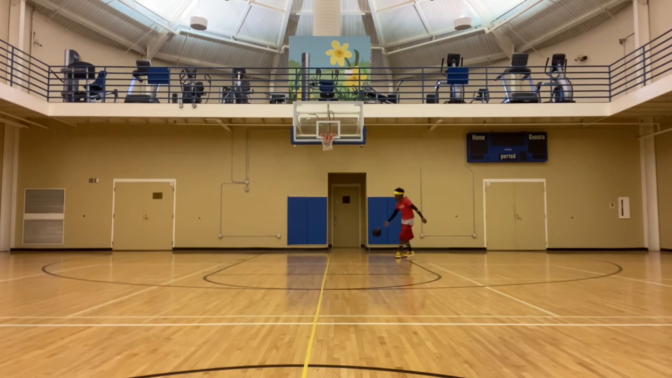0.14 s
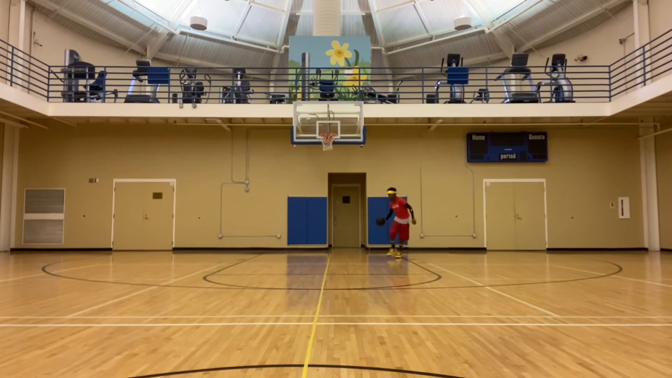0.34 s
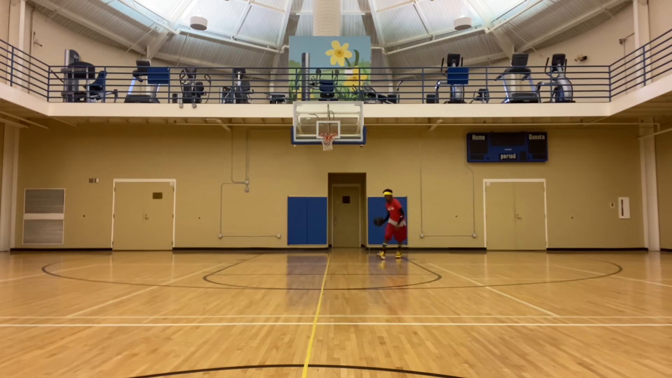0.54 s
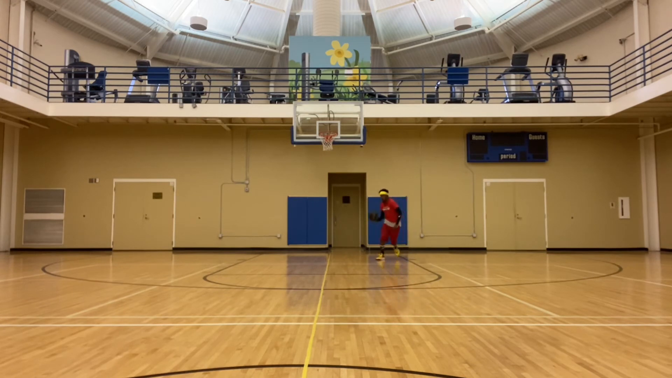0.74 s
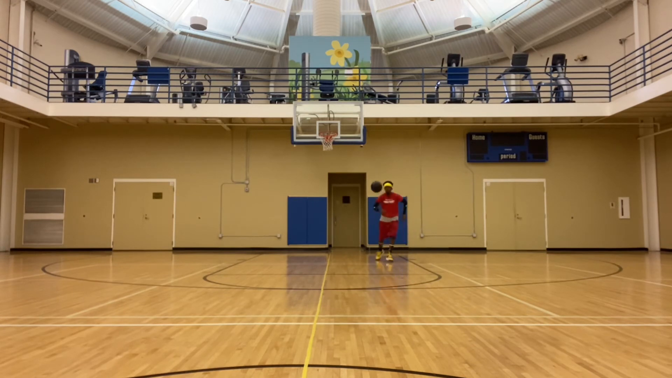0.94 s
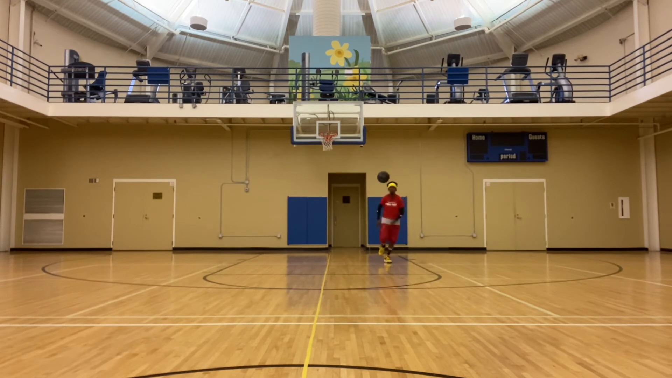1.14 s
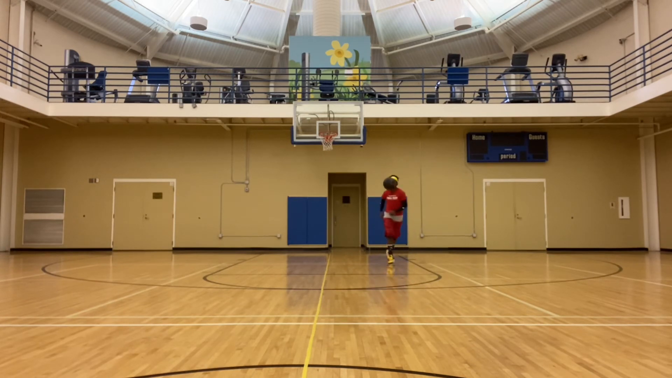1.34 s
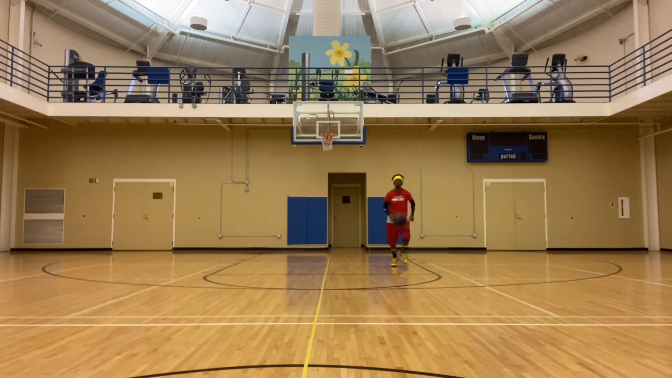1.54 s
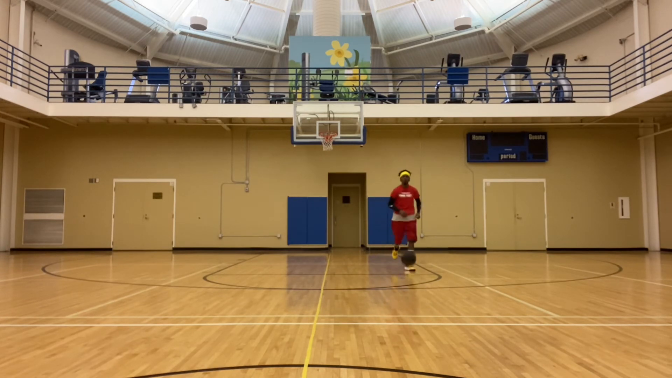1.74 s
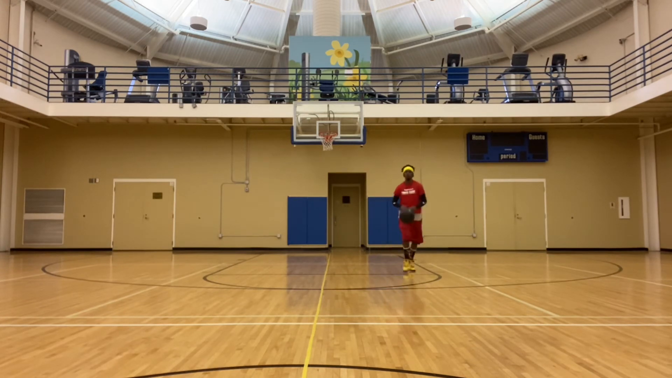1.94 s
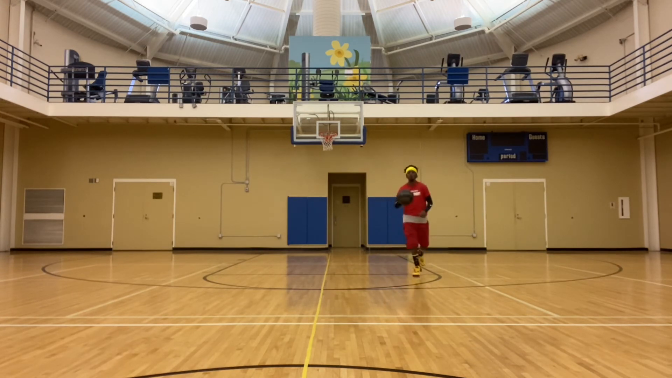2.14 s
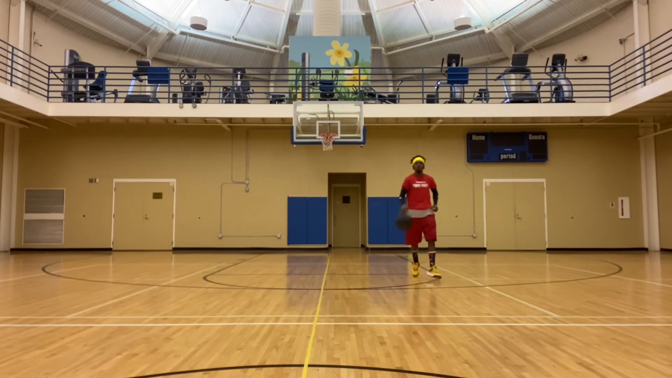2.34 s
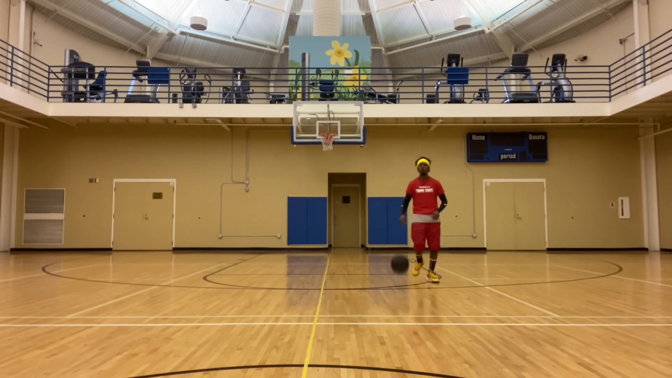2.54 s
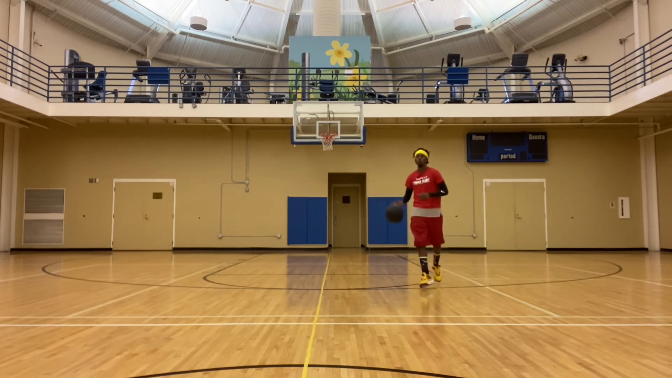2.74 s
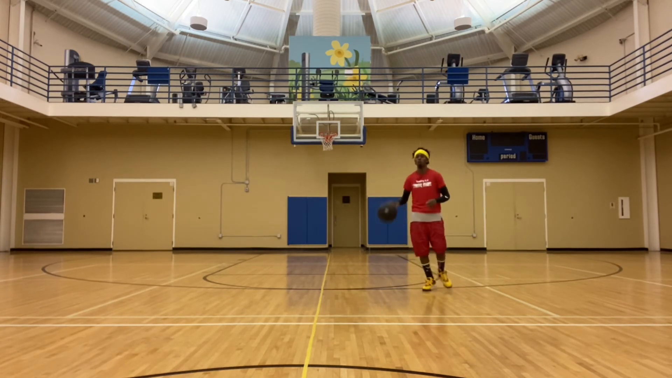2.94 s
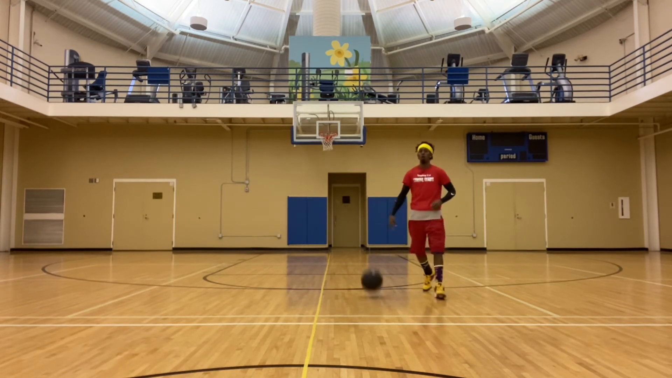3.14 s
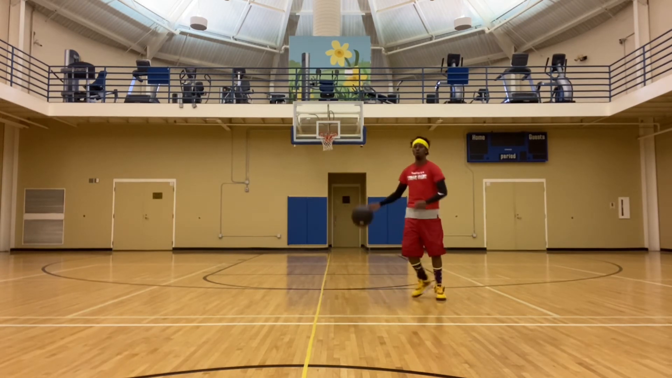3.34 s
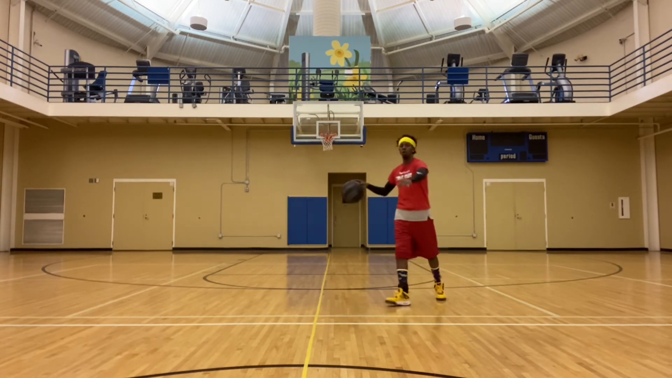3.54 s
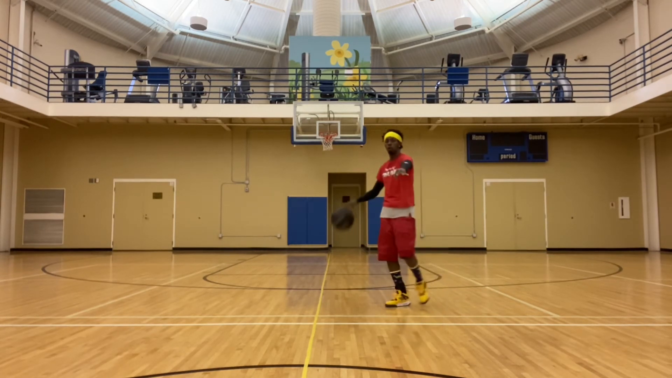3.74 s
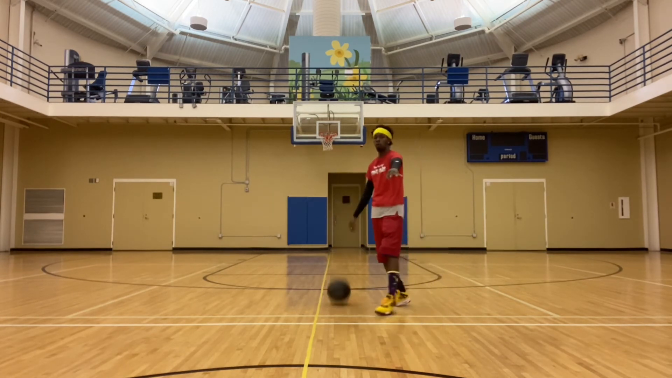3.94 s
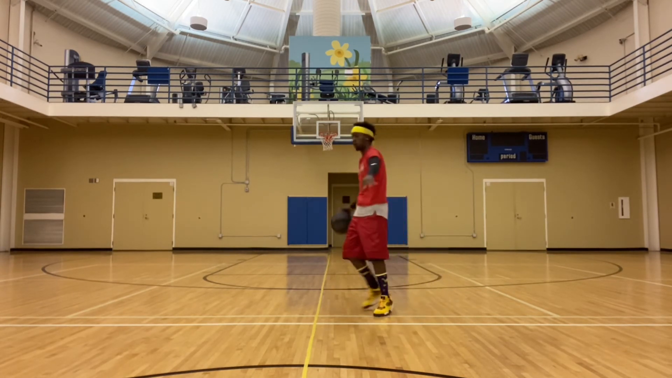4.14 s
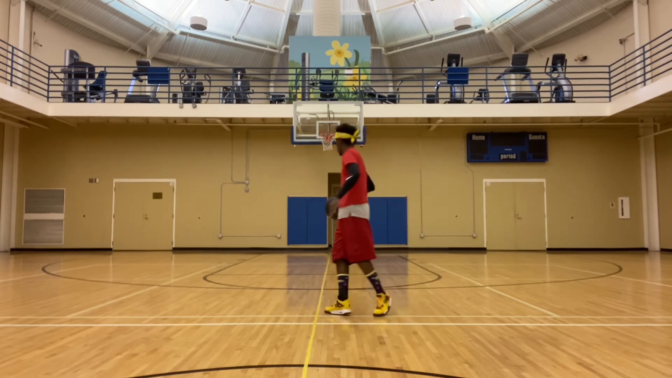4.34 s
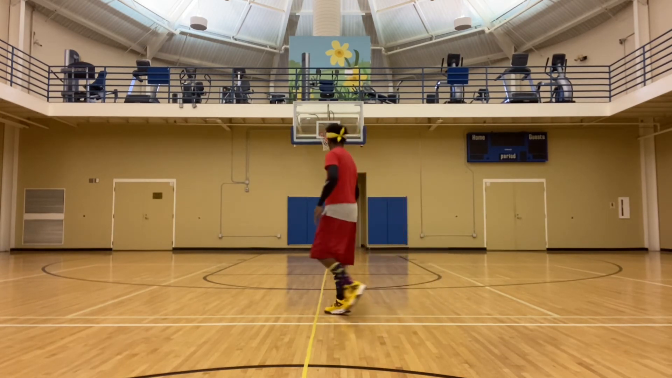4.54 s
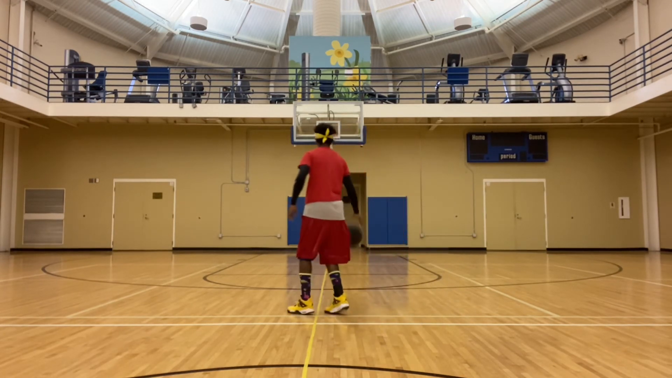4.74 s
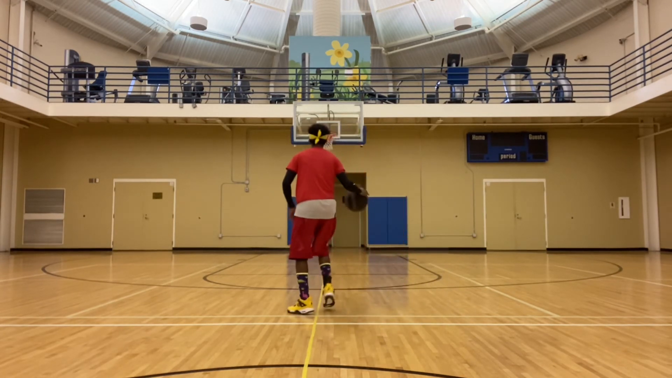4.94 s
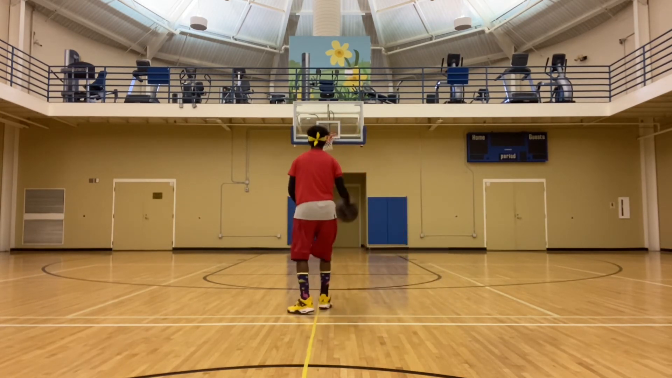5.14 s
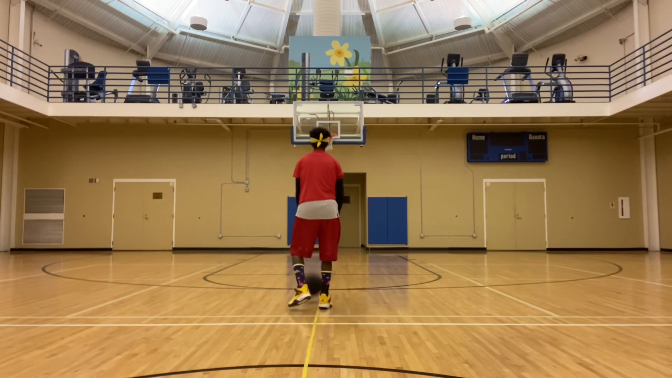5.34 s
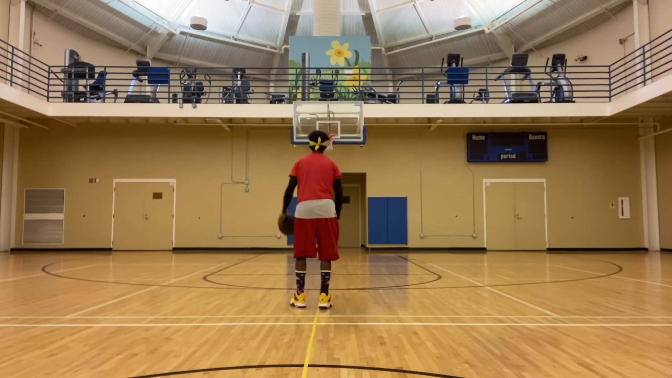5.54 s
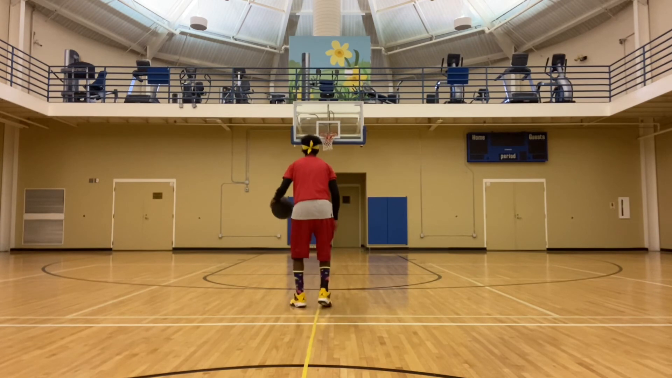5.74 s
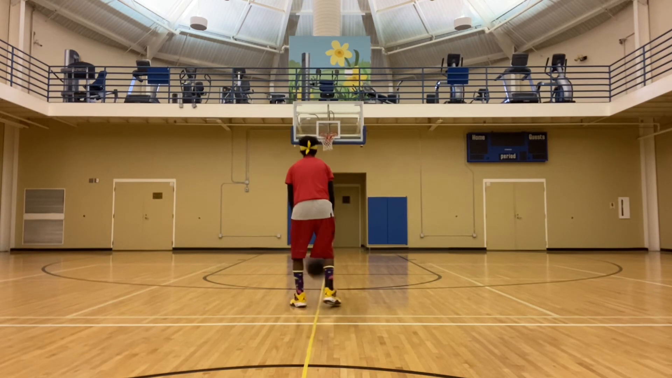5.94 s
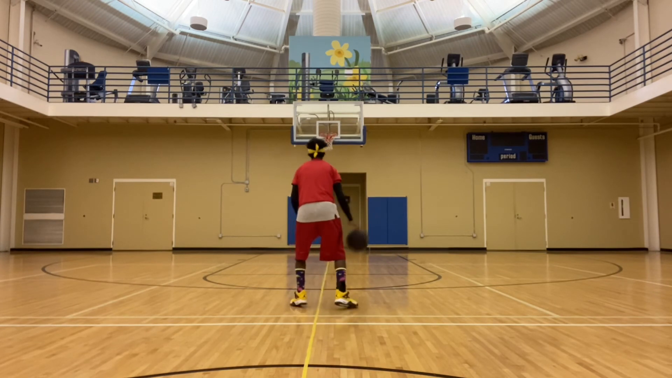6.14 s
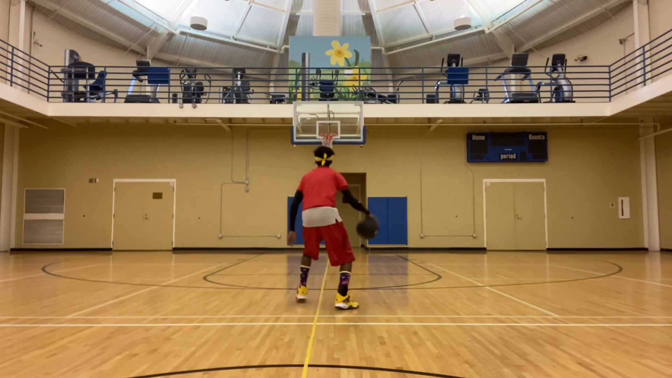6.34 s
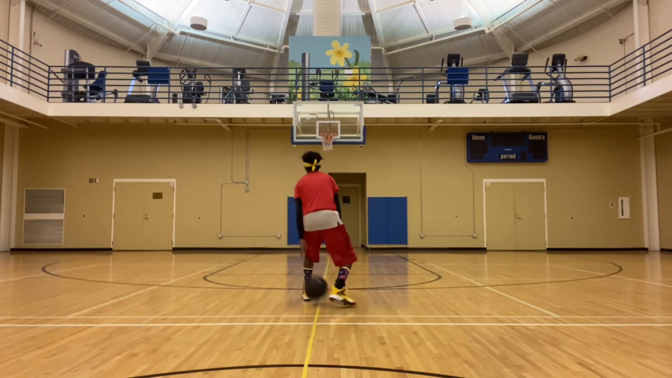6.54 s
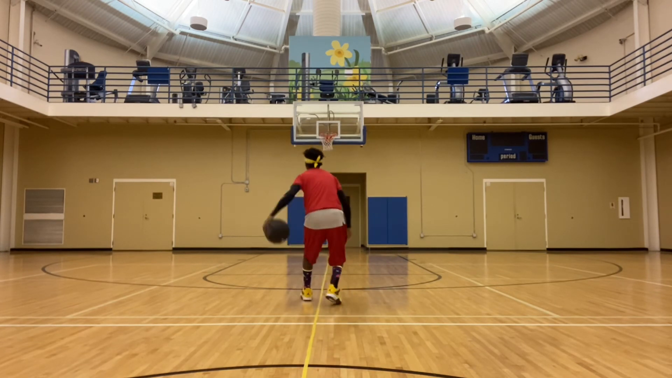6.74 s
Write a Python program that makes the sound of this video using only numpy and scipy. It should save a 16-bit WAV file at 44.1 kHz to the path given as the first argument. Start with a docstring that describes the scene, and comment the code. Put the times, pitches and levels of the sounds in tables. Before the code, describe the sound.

A basketball bounces slowly, then a little faster, on a sprung hardwood floor, each sharp slap and falling boom ringing through a big empty gym.

```python
"""A basketball bounces on the sprung hardwood floor of a big empty gym as its player walks towards the microphone.
Each bounce adds a sharp slap, a ping of the ball and a boom that falls in pitch, from a flexing floor.
Walls, balcony and dome send back echoes, and a fading noise makes the hall ring on for seconds.
Soft pulses are hands patting the ball, short brushes of noise are shoes, a steady rumble is the ventilation."""
import sys
import numpy as np
from scipy import signal
from scipy.fft import rfft, irfft
from scipy.io import wavfile

SR = 44100
rng = np.random.default_rng(int(sys.argv[2]) if len(sys.argv) > 2 else 0)


def transcribe(signal):
    """Save signal, clipped to [-1, 1], as a 16-bit WAV file at the path in sys.argv[1]."""
    frames = np.atleast_2d(signal).T
    limited = np.clip(frames, -1, 1)
    pcm = np.round(limited * 32767).astype(np.int16)
    wavfile.write(sys.argv[1], SR, pcm)


N = 303849   # length of the scene in samples

# Ventilation loudness by pitch. Each row: frequency in Hz, level in dB.
VENT_SPECTRUM = [(15, -42), (25, -27), (44, 3), (116, -6), (173, -2.5), (208, -7.5), (448, -19.5),
                 (802, -29.5), (1230, -31.5), (1730, -39.5), (3010, -50), (3630, -55), (7030, -57),
                 (14000, -65)]
VENT_DB = -39.5
# How the hall rings on. Each row: frequency in Hz, reverberation level in dB,
# time to fade by 60 dB in seconds, left-right likeness (1 is identical, 0 is unrelated).
HALL = [(35, 7, 11, 0.92), (64.8, 10, 4.45, 1), (107, 5, 2.8, .7), (209, 12, 2.03, 0.74),
        (370, 13.5, 1.97, 0.36), (620, 13, 1.94, 0), (1150, 9, 1.53, 0), (2370, 5.5, 1.74, 0.058),
        (4000, 5, 1.33, 0.062), (6350, 8, 0.76, .1), (13100, 0.5, 0.47, .1)]
# Shoe scuffs. Each row: time of the middle in seconds, level in dB, length in seconds.
SCUFFS = [(1.203, -63, 0.019), (1.332, -66, .02), (1.425, -66.5, 0.04), (3.752, -64, .025),
          (4.182, -54, 0.029), (4.952, -45, 0.014)]
# Sole brushing on varnish. Each row: frequency in Hz, level in dB.
SOLE_SPECTRUM = [(300, -7), (1500, -9), (4500, -5.5), (8500, -10), (14000, -19)]
# Hands on the ball. Each row: start in seconds, level in dB.
PATS = [(.472, -29.5), (1.288, -27.5), (1.332, -29), (2.333, -20), (2.679, -21.5)]
# Palm on the ball. Each row: frequency in Hz, level in dB.
PALM_SPECTRUM = [(100, 3), (400, 8), (800, 19.5), (1400, 15), (2300, -5), (4000, -15), (9000, -24),
                 (14000, -41)]
# The walk towards the microphone. Each row: time in seconds, distance in metres.
WALK = [(1.6, 10), (2.4, 9), (3.0, 7.6), (3.8, 5.9), (4.5, 5)]
NEAR_M, FAR_M = WALK[-1][1], WALK[0][1]
# Bounces. Each row: start in seconds, boom in dB, slap in dB,
# treble tilt of the slap in dB per octave above 1000 Hz, ping in dB.
BOUNCES = [(-.19, -3.5, -2, -1, 0.5), (1.6182, 1, 0, -0.94, -1), (2.4064, 0, 1.5, -0.85, -9.5),
           (3.0284, 1.5, 1.5, 0.28, 6.5), (3.8188, 0.5, 0, -1.63, 1), (4.4853, 1, -1.6, -0.34, -0.5),
           (5.2278, -0.5, -3, -2.6, -0.5), (5.8984, 0, -2.5, 0.27, 4.5), (6.4283, 0, 4, -1, -5)]
# Slap of the ball on the floor. Each row: frequency in Hz, level in dB.
SLAP_SPECTRUM = [(100, 5), (300, 16), (700, 8), (1100, 9), (1700, 9), (2300, 8), (3400, 8.5), (4500, 7),
                 (6200, 4.5), (7900, 8), (10000, 9), (12700, -2), (14200, -6), (15500, -19)]
# Typical ringing of the ball's air and shell. Each row: frequency in Hz, level in dB,
# time to fade by 60 dB in seconds.
BALL_MODES = [(814, -41, 0.017), (898, -31.5, 0.074), (987, -24, 0.04), (1030, -22, 0.022),
              (1138, -30.5, 0.016), (1210, -32.5, 0.04), (1600, -34, 0.024), (1740, -39, 0.043),
              (3400, -42.5, 0.02)]
# Typical ringing of the floorboards. Each row: frequency in Hz, level in dB,
# time to fade by 60 dB in seconds.
FLOOR_MODES = [(190, -21, 0.046), (229, -21.5, 0.11), (324, -39.5, 0.032), (412.4, -27, 0.076),
               (524, -32, .05)]
# Clatter of the floorboards. Each row: frequency in Hz, level in dB.
BOARDS_SPECTRUM = [(120, -18.5), (300, 1), (700, -1), (1600, -12.5), (2400, -26), (5000, -29),
                   (9000, -35.5), (14000, -41.5)]

# Echo delays at the nearest spot, and how much they shrink with distance beyond it
WALL_S, WALL_S_PER_M2 = .0353, .00033
DOME_S, DOME_S_PER_M = .079, .0035
# Lag of the left ear at the nearest spot, and its growth with distance
EAR_LAG_MS, EAR_LAG_MS_PER_M = .035, .014
KNOCK_LAG_S = .0026   # how much later the right ear hears the bass knock from the wall
# Echoes from balcony and far walls; blur is an echo's length as a share of its delay
ECHO_FIRST_S, ECHO_SPACING_S, ECHO_BLUR = .04, .018, .022
ECHO_DB, ECHO_LOSS_DB_PER_S = -24.5, 55
# The boom's flutter between floor and dome (loss is per trip), and its late swell
FLUTTER_FIRST_S, FLUTTER_TRIP_S, FLUTTER_DB, FLUTTER_LOSS_DB = 0.05384, .068, -5.5, 3.5
SWELL_S, SWELL_DB = .4, -9
# Starting pitch of the boom and level of the clatter at the nearest spot
BOOM_HZ, CLATTER_DB = 263.7, -3.5
# What the far floor adds to each, and the distance over which that happens
BOOM_FAR_HZ, CLATTER_FAR_DB, FLOOR_CHANGE_M = 76, 5.5, 2.1
CLATTER_FOLLOWS = 1.2   # dB of clatter for each dB of boom
# Slap and ping sent into the hall; beaming is the share of the slap's level taken off that send
HALL_SEND_DB, HALL_DB_PER_M, SLAP_BEAMING = 0.73, 0.31, 0.97
CUTOFF_HZ = 16000

SHORT, LONG = 8192, 3 * SR   # lengths in samples of a dry sound and of a hall response
LEAD = 64   # samples of room ahead of each hit
AGE = np.arange(SHORT) / SR   # seconds
HZ = np.maximum(np.arange(SHORT // 2 + 1) * SR / SHORT, 1)


def from_db(db):
    """Turns decibels into gain."""
    return 10 ** (np.asarray(db) / 20)


def at_hz(points, hz):
    """Reads a table between its rows, on a log-frequency axis; one result per column."""
    knots, *columns = np.transpose(points)
    return np.squeeze([np.interp(np.log(hz), np.log(knots), c) for c in columns])


def add(out, sound, s):
    """Mixes a sound into out, starting at time s."""
    start = int(round(s * SR))
    a, b = max(start, 0), min(start + sound.shape[-1], out.shape[-1])
    if b > a:
        out[..., a:b] += sound[..., a - start:b - start]


def noise(spectrum, size):
    """Hiss whose loudness at each pitch follows a spectrum."""
    hz = np.maximum(np.arange(size // 2 + 1) * SR / size, 1)
    white = rfft(rng.standard_normal(size))
    return irfft(white * from_db(at_hz(spectrum, hz)), size)


def diffuse(size):
    """Frequencies and stereo spectrum of noise from all sides: alike in the bass, unrelated higher up."""
    hz = np.maximum(np.arange(size // 2 + 1) * SR / size, 1)
    alike = np.clip(at_hz(HALL, hz)[2], -.99, .99)
    mid, side = rfft(rng.standard_normal((2, size)))
    shared = np.sqrt((1 + alike) / 2) * mid
    opposed = np.sqrt((1 - alike) / 2) * side * [[1], [-1]]
    return hz, shared + opposed


def ventilation():
    """Steady rumble that fills the hall: stereo noise, strongest in the bass."""
    hz, white = diffuse(N)
    air = irfft(white * from_db(at_hz(VENT_SPECTRUM, hz)), N)
    return from_db(VENT_DB) * air / air.std()


def hall_tails(count, early_db=3.0, early_s=0.03):
    """Fading noise of the hall, one for each bounce; the air swallows the treble first."""
    size, t = 8 * SR, np.arange(LONG) / SR
    hz, white = diffuse(size)
    white = white * from_db(at_hz(HALL, hz)[0]) / np.sqrt(SR)
    starts = rng.integers(0, size - LONG, count)
    tails, centres = np.zeros((count, 2, LONG)), np.geomspace(35, 14000, 14)
    # each band of pitches fades at its own pace
    for centre, share in zip(centres, np.eye(len(centres))):
        band = irfft(white * np.interp(np.log(hz), np.log(centres), share), size)
        decay = from_db(-60 * t / at_hz(HALL, centre)[1])
        for tail, start in zip(tails, starts):
            tail += band[:, start:start + LONG] * decay
    return tails * from_db(early_db * np.exp(-(t / early_s) ** 4))


def paths(beyond_m):
    """Wall and dome echo delays, shorter from further off, and left ear lag, longer from further off."""
    wall_s = WALL_S - WALL_S_PER_M2 * beyond_m ** 2
    dome_s = DOME_S - DOME_S_PER_M * beyond_m
    return wall_s, dome_s, EAR_LAG_MS + EAR_LAG_MS_PER_M * beyond_m


def scatter(level_db, length_s, air_cut_hz=9500):
    """An echo from a rough surface: a brief stereo cluster of reflections, dulled on its way."""
    cluster = rng.standard_normal((2, SHORT)) * np.exp(-AGE / length_s)
    dulled = signal.sosfilt(signal.butter(1, air_cut_hz, fs=SR, output="sos"), cluster)
    return from_db(level_db) * dulled / np.sqrt(SR * length_s / 2)


def stray_echoes(count=7):
    """Balcony and far walls answer at uneven moments, later ones weaker and more blurred."""
    delays = ECHO_FIRST_S + ECHO_SPACING_S * (np.arange(count) + rng.random(count))
    # delay in seconds, level in dB, length in seconds
    return [(s, ECHO_DB - ECHO_LOSS_DB_PER_S * s, ECHO_BLUR * s) for s in delays]


def in_hall(sound, tail, wall_s, dome_s, build_s=0.0039, dome_db=-21):
    """What the hall returns after a gap: wall, balcony and dome echoes over the growing, then fading tail."""
    response = tail * np.sqrt(np.clip((np.arange(LONG) / SR - wall_s) / build_s, 0, 1))
    add(response, scatter(level_db=-13, length_s=0.0052), wall_s)
    add(response, from_db([[dome_db], [dome_db]]), dome_s)   # one clean echo
    add(response, scatter(level_db=-17.5, length_s=0.012), dome_s)
    for delay, db, length_s in stray_echoes():
        add(response, scatter(db, length_s), delay)
    return signal.fftconvolve(response, sound[None], axes=1)


def scuff(level_db, length_s):
    """A sole brushes the varnish: noise that swells and fades."""
    swell = np.exp(-((AGE - AGE.mean()) / length_s) ** 2)
    return from_db(level_db) * noise(SOLE_SPECTRUM, SHORT) * swell


def crack(spectrum, tilt_db, spread_s):
    """One sharp pulse; as in any bending wave, the treble runs ahead of the bass."""
    tilt = tilt_db * np.log2(np.maximum(HZ / 1000, 1))
    gain = from_db(at_hz(spectrum, HZ) + tilt)
    phase = 4 * np.pi * spread_s * np.sqrt(1000 * HZ)
    return np.roll(irfft(gain * np.exp(-1j * phase)), LEAD)


def pat(level_db, tail, skin_db=-24, skin_t60=0.075, hall_db=-8, soft_hz=3000):
    """A soft palm meets the ball: a dull pulse and a short rub, echoed as from the far spot."""
    rub = np.roll(from_db(skin_db - 60 * AGE / skin_t60) * noise(PALM_SPECTRUM, SHORT), LEAD)
    touch = from_db(level_db) * (crack(PALM_SPECTRUM, 0, spread_s=0.0037) + rub)
    touch = signal.sosfilt(signal.butter(2, soft_hz, fs=SR, output="sos"), touch)
    wall_s, dome_s, _ = paths(FAR_M - NEAR_M)
    out = from_db(hall_db) * in_hall(touch, tail, wall_s, dome_s)
    add(out, touch, 0)
    return out


def boom(start_hz, end_hz=58, glide_s=0.0082, peak_s=0.012, level_db=-9.5):
    """The sprung floor flexes: a swell that falls in pitch as the slower long waves arrive."""
    pitch_hz = end_hz + (start_hz - end_hz) * np.exp(-AGE / glide_s)
    turns = np.cumsum(pitch_hz) / SR
    swell = (AGE / peak_s * np.exp(1 - AGE / peak_s)) ** 2
    return np.roll(-from_db(level_db) * swell * np.sin(2 * np.pi * turns), LEAD)


def flutter(count=5):
    """The boom loses a little on each trip between floor and dome, then swells once more."""
    # delay in seconds, level in dB
    trips = [(FLUTTER_FIRST_S + k * FLUTTER_TRIP_S, FLUTTER_DB - k * FLUTTER_LOSS_DB) for k in range(count)]
    return trips + [(SWELL_S, SWELL_DB)]


def bass_echoes(low, wall_s, knock_hz=160, knock_db=0):
    """The boom knocks back from a side wall, left ear first, then flutters between floor and dome."""
    out = np.zeros((2, LONG))
    knock = from_db(knock_db) * signal.lfilter(*signal.iirpeak(knock_hz, 3.0, fs=SR), low)
    add(out[0], knock, wall_s - KNOCK_LAG_S)
    add(out[1], knock, wall_s)
    deep = signal.sosfilt(signal.butter(2, [50, 105], "band", fs=SR, output="sos"), low)
    for delay, db in flutter():
        add(out, from_db(db) * deep, delay)
    return out


def boards(t60=0.057, lift_s=.012, lift_db=-7, level_db=-7):
    """The floorboards clatter as the ball lands and again as it lifts off."""
    landing = from_db(-60 * AGE / t60)
    lift = from_db(lift_db) * np.interp(AGE - lift_s, AGE, landing, left=0)
    return np.roll(from_db(level_db) * noise(BOARDS_SPECTRUM, SHORT) * (landing + lift), LEAD)


def ring(table, vary_db=3.0, detune=0.022):
    """Fading tones of a struck object; each tone's strength and pitch are drawn around the table's values."""
    hz, db, t60 = np.transpose(table)[:, :, None]
    hz = hz * (1 + detune * rng.standard_normal(hz.shape))
    db = db + vary_db * rng.standard_normal(db.shape)
    modes = from_db(db - 60 * AGE / t60) * np.sin(2 * np.pi * hz * AGE)
    return np.roll(-modes.sum(0), LEAD)


def ball(lift_s=0.011, lift_db=-7, vary_db=1.5, detune=.008):
    """The ball rings when it lands, and again when it springs off the floor."""
    out = ring(BALL_MODES, vary_db, detune)
    add(out, from_db(lift_db) * ring(BALL_MODES, vary_db, detune), lift_s)
    return out


def grip(level_db=-27, t60=0.017):
    """The pebbled skin flattens on the varnish: a few milliseconds of grit after the slap."""
    return np.roll(noise(SLAP_SPECTRUM, SHORT) * from_db(level_db - 60 * AGE / t60), LEAD)


def at_ears(sound, lag_ms, port_hz=7200, port_lead_ms=0.17):
    """Sound from the right reaches the left late; in the treble the microphone's port spacing takes over."""
    top = (1 + np.tanh((HZ - port_hz) / 800)) / 2
    turns = (-(1 - top) * HZ * lag_ms + top * (HZ - port_hz) * port_lead_ms) / 1000
    # half of the shift goes to each side, in opposite directions
    return irfft(rfft(sound) * np.exp(1j * np.pi * turns * [[1], [-1]]))


def blow(beyond_m, boom_db, slap_db, tilt_db, ping_db):
    """How a bounce sounds from its spot: the far floor booms higher, clatters more and feeds the hall more."""
    far = np.tanh(beyond_m / FLOOR_CHANGE_M) ** 2
    start_hz = BOOM_HZ + BOOM_FAR_HZ * far
    boards_db = CLATTER_DB + CLATTER_FAR_DB * far + CLATTER_FOLLOWS * boom_db
    hall_db = HALL_SEND_DB + HALL_DB_PER_M * beyond_m - SLAP_BEAMING * slap_db
    return boom_db, start_hz, boards_db, slap_db, tilt_db, ping_db, hall_db


def bounce(tail, wall_s, dome_s, lag_ms, boom_db, start_hz, boards_db, slap_db, tilt_db, ping_db, hall_db,
           ping_hall_db=-8, wood_hall_db=-6, focus_db=-12, focus_lag_s=.004):
    """Ball hits floor: boom, wood, ping and slap are heard directly and through their echoes."""
    low = boom(start_hz) * from_db(boom_db)
    ping = from_db(ping_db) * ball()
    wood = from_db(boards_db) * (ring(FLOOR_MODES) + boards())
    slap = from_db(slap_db) * crack(SLAP_SPECTRUM, tilt_db, spread_s=0.001192)
    sharp = from_db(hall_db) * (from_db(ping_hall_db) * ping + slap)
    radiated = low + from_db(wood_hall_db) * wood + sharp
    out = in_hall(radiated, tail, wall_s, dome_s)
    direct = low + wood + ping + slap + from_db(slap_db) * grip()
    add(out, at_ears(direct, lag_ms), 0)
    # the dome focuses what goes upward, and its ribs blur it
    upward = ping + wood
    add(out, from_db(focus_db) * upward, dome_s + focus_lag_s)
    blurred = signal.fftconvolve(scatter(level_db=-9.5, length_s=0.026), upward[None], axes=1)
    add(out, blurred, dome_s - .014)
    add(out, bass_echoes(low, wall_s), 0)
    return out


def scene():
    """Bounces, pats and scuffs over the ventilation."""
    out = ventilation()
    tails = hall_tails(count=len(BOUNCES))
    for (s, *touch), tail in zip(BOUNCES, tails):
        beyond_m = np.interp(s, *np.transpose(WALK)) - NEAR_M
        add(out, bounce(tail, *paths(beyond_m), *blow(beyond_m, *touch)), s - LEAD / SR)
    for s, db in PATS:
        add(out, pat(db, tails[0]), s - LEAD / SR)
    for s, db, length_s in SCUFFS:
        add(out, scuff(db, length_s), s - AGE.mean())
    return out


def record(dry, notch_hz=10400, notch_q=3.2, left_db=-1.1, low_cut_hz=36):
    """The microphone loses the deepest bass, its ports cut a notch in the treble; the top is cut off."""
    thinned = signal.sosfilt(signal.butter(3, low_cut_hz, "high", fs=SR, output="sos"), dry)
    notched = signal.lfilter(*signal.iirnotch(notch_hz, notch_q, fs=SR), thinned)
    balanced = notched * from_db([[left_db], [0]])   # the left side is a little quieter
    return signal.sosfilt(signal.cheby1(10, .2, CUTOFF_HZ, fs=SR, output="sos"), balanced)


dry = scene()
out = record(dry)
transcribe(out)
```